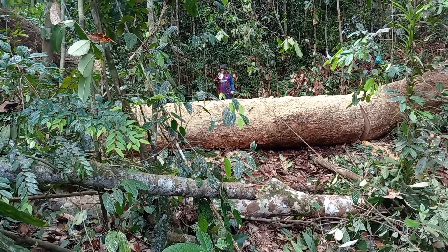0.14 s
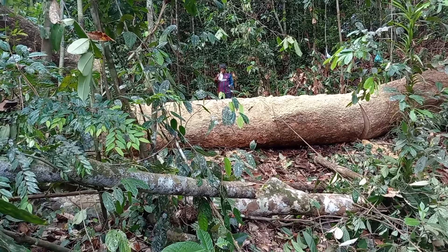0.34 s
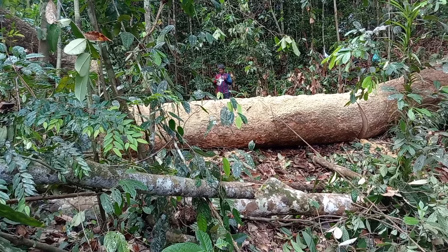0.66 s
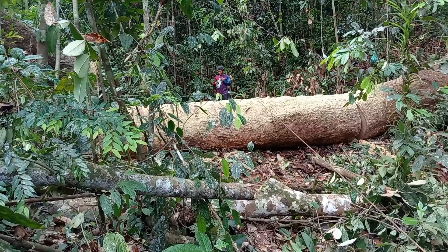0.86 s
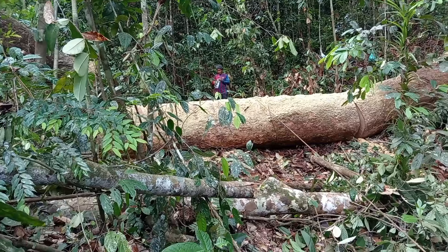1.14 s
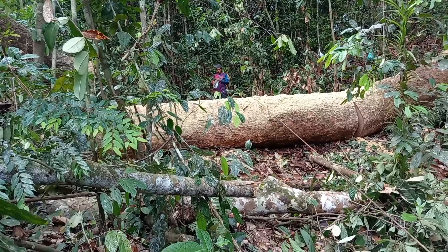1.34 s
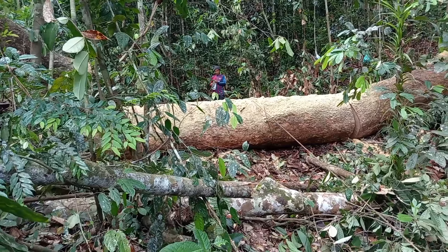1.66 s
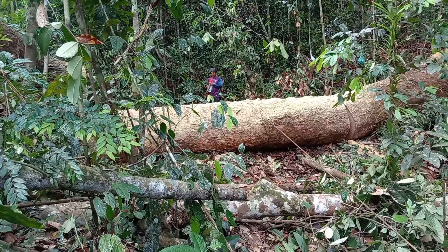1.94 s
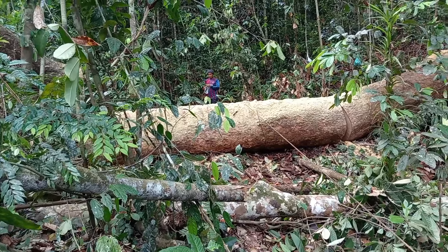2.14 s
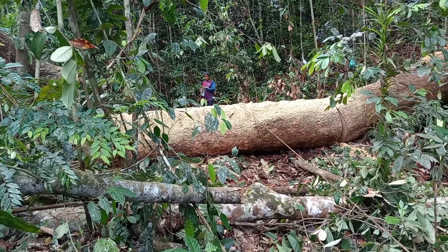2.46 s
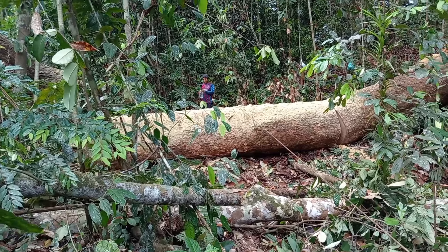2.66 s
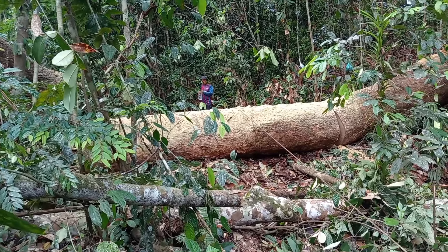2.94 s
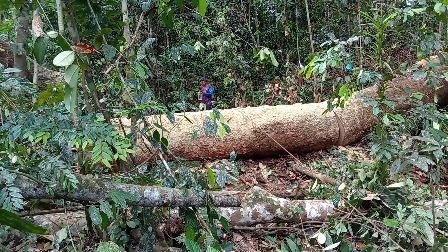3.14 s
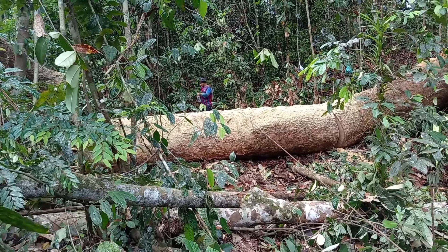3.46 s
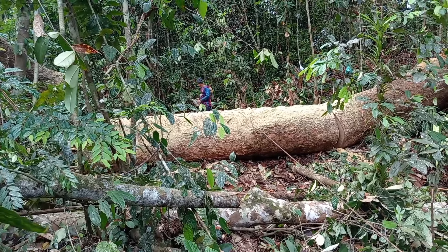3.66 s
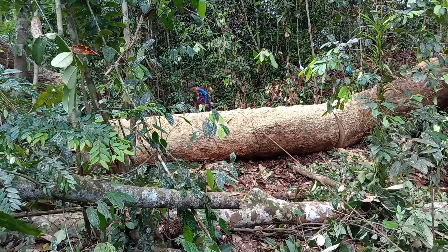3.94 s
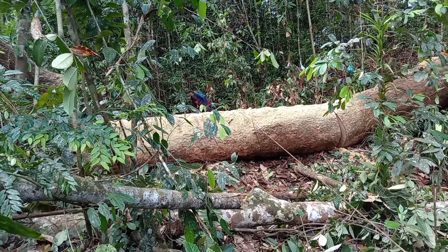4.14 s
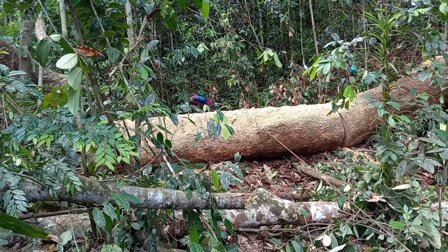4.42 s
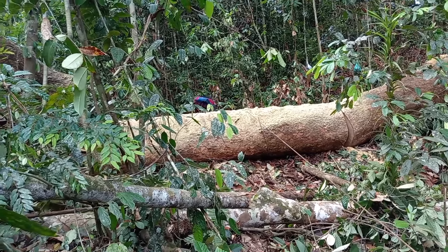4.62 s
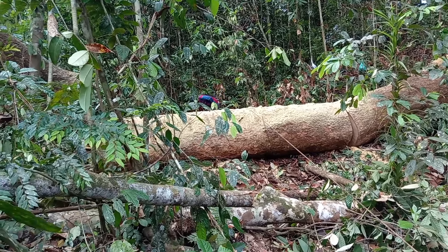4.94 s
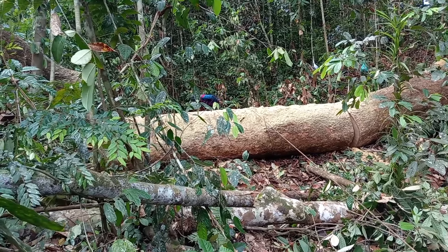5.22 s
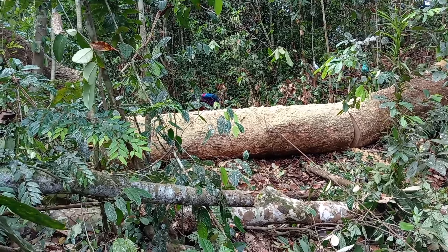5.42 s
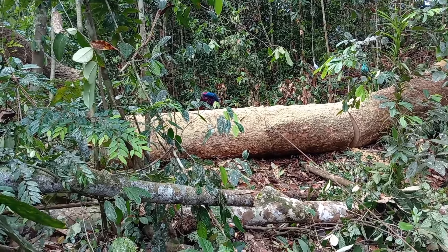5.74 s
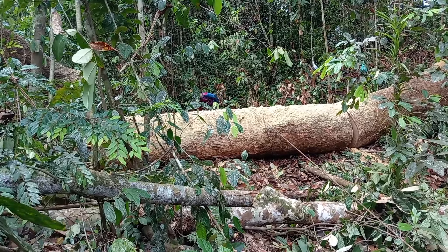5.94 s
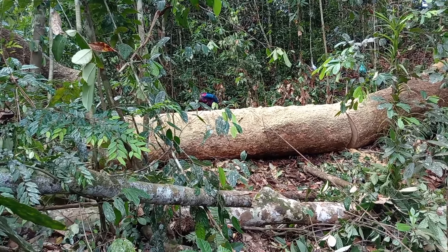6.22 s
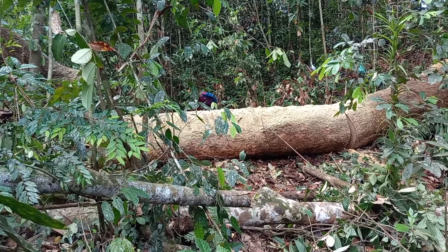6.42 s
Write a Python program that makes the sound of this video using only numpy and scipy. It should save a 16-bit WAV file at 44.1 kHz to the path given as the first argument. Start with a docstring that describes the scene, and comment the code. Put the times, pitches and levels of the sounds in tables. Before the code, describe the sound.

A hand ratchet winch clicks from the start, hauling a log in a forest, to the right of the microphone. Its strokes repeat evenly about every 0.65 seconds, ten pulls in all, the first near 0.4 seconds and the last near 6.3. Each pull is a steel clack followed by three or four quick, bright clicks, the last slightly late. Each return is a metal click and three to five lighter ticks. Loose links clink between strokes, with faint cable scrapes and slight low thuds underneath. A soft, hollow wooden knock comes at about 3.5 seconds, and a louder one at 4.2, just after an extra steel clack. The ratcheting keeps its pace until the end, at about 6.6 seconds. The clicks have a short, light echo from the trees, and a faint, high insect hiss and soft hush of air continue throughout.

```python
"""A faint clink, a clack and a run of light ticks: a hand ratchet winch is hauling a log in a forest.
On each pull the lever clacks home and the pawl (a small steel finger) drops over three or four teeth.
On each return the load lands on the catch and the pawl ticks back lightly. The cable scrapes, loose links
clink, and something wooden knocks twice, the louder time just after an extra steel clack. Every blow
makes a part ring at its own pitches. Leaves and trunks scatter every click, and insects hiss steadily."""
import sys
import numpy as np
from scipy import signal
from scipy.fft import rfft, irfft, next_fast_len
from scipy.io import wavfile
from scipy.ndimage import uniform_filter1d, map_coordinates

SR = 44100
rng = np.random.default_rng(int(sys.argv[2]) if len(sys.argv) > 2 else 0)


def transcribe(u):
    """Save the signal u as a 16-bit wav file named by the first command-line argument.

    u: samples, shape (n,) or (channels, n), limited to [-1, 1]; the rate is SR.
    q: integer samples, one column per channel.
    """
    v = np.clip(np.atleast_2d(u).T, -1, 1)
    q = np.round(v * 32767).astype(np.int16)
    wavfile.write(sys.argv[1], SR, q)


N = 290351
SIZE = 8192  # samples in one short sound
HZ = np.fft.rfftfreq(SIZE, 1 / SR)  # the frequencies in that sound
AGE = np.arange(SIZE) / SR  # seconds since it began

# Levels in the tables are relative. A "mode" is a pitch at which a part likes to ring.
# Pulls, the pawl dropping over a few teeth:
# first tooth/s, end of the even run/s, late last tooth/s, teeth, level/dB, treble/dB, thud/dB, scrape/dB
PULLS = [(0.4278, 0.5213, 0.609, 4, -15, -8.5, -48, -45),
         (1.0988, 1.1434, 1.1919, 3, -13.5, -12, -57.5, -47),
         (1.742, 1.835, 1.8949, 4, -13, -11, -52.5, -62),
         (2.4167, 2.4669, 2.5482, 3, -14, -10.5, -54.5, -41),
         (3.0864, 3.136, 3.216, 3, -16.5, -10, -55.5, -55),
         (3.7317, 3.7816, 3.8539, 3, -15.5, -7.5, -54.5, -39.5),
         (4.388, 4.4433, 4.5128, 3, -16.5, -8.5, -57, -37),
         (5.0461, 5.103, 5.1734, 3, -17, -11.5, -61.5, -49),
         (5.679, 5.7331, 5.8151, 3, -16.5, -10.5, -57.5, -52),
         (6.3143, 6.3656, 6.4266, 3, -13.5, -9, -61, -56)]
# Returns, the load landing on the catch and the pawl ticking back:
# landing/s, level/dB, treble/dB, thud/dB, scrape/dB, first tick/s, last tick/s, ticks, tick level/dB
RETURNS = [(0.0516, -18.5, -15.5, -58, -51, 0.1099, 0.277, 5, -29),
           (0.6927, -17.5, -15.5, -55, -41, 0.7545, 0.903, 5, -29),
           (1.3494, -15.5, -17, -48.5, -42.5, 1.4135, 1.575, 5, -29),
           (2.041, -16.5, -17.5, -50, -41.5, 2.0939, 2.212, 4, -28.5),
           (2.6576, -18.5, -13, -57, -47.5, 2.7184, 2.836, 4, -26.5),
           (3.3281, -18.5, -17.5, -53, -43, 3.3807, 3.504, 4, -26.5),
           (3.9948, -17.5, -15, -53, -44.5, 4.0466, 4.1234, 3, -26),
           (4.659, -15, -21, -51.5, -40, 4.7035, 4.805, 4, -26),
           (5.2977, -18, -21.5, -52.5, -38, 5.3473, 5.471, 4, -26.5),
           (5.9267, -17.5, -15.5, -54, -46, 5.9771, 6.082, 4, -25.5)]
# Steel clacks: the lever going home, and one clack just before the loud wooden knock:
# t/s, level/dB, treble/dB, thud/dB, rebound delay/s, rebound level/dB
CLACKS = [(0.3439, -18.5, -11, -49.5, 0.027, -19.5), (1.033, -11.5, -10, -46.5, .018, -24.5),
          (1.649, -17.5, -12.5, -53, 0.024, -20.5), (2.332, -18, -12.5, -46, 0.015, -20.5),
          (3.0078, -24.5, -16.5, -46, 0.011, -14), (3.650, -18.5, -10, -51, 0.01, -17),
          (4.158, -13, -7.5, -44.5, 0.016, -30), (4.2985, -18, -12, -48.5, 0.011, -17),
          (4.9439, -16, -13, -50, .0111, -19), (5.6061, -21, -6.5, -53, 0.011, -34),
          (6.237, -12.5, -9.5, -48, 0.018, -24.5)]
# Modes of the loose links, also used for the scrapes: f/Hz, width/Hz, level/dB
LINK_MODES = [(1557, 1490, 0), (1810, 570, 0.5), (2920, 360, -8.5), (3400, 440, -2), (3680, 870, -4.5),
              (4640, 1500, -4.5), (5920, 320, -14.5), (6627, 620, -21)]


def teeth():
    """Each pull turns the wheel evenly, then slows. Gives rows of t/s, level/dB, treble/dB, thud/dB."""
    slowing_db = -8.5  # a tooth is weaker by this each time the gap before it doubles
    first_tooth_db, thud_fade_db = -0.76, -5.5  # the first tooth is still slow; each thud is weaker
    rows = []
    for first, even_end, last, count, db, treble_db, thud_db, _ in PULLS:
        run, gap = np.linspace(first, even_end, round(count) - 1, retstep=True)
        times = np.append(run, last)
        doublings = np.log2(np.diff(times, prepend=first - gap) / gap)
        levels = db + slowing_db * doublings + first_tooth_db * (times == first)
        rows += [(t, levels[k], treble_db, thud_db + thud_fade_db * k) for k, t in enumerate(times)]
    return rows


def pawl_drops():
    """The pawl snaps down behind each tooth and rings."""
    modes = [(1445, 520, -15.5), (1680, 1660, -3), (2090, 120, -60), (2430, 460, -1), (2752, 212, -26),
             (3340, 780, -3), (3910, 440, 3.5), (4461, 285, -23), (5060, 730, -5.5), (5910, 2140, -6),
             (6550, 100, -10.5), (7720, 97, -15.5), (8630, 2550, -15.5), (11459, 3100, -46),
             (15000, 1500, -18)]  # the dropping pawl's ring: f/Hz, width/Hz, level/dB
    sound = clicks(teeth(), modes, level_db=-9, treble_db=7, attack_s=0.00084, contact_t60=0.03,
                   scatter_db=-17.5, scatter_t60=0.11, spread=2.57)
    return small_part(sound, edge_hz=1130)


def pawl_ticks():
    """With no load on it, the pawl skips back at an even pace, each tick a little different."""
    modes = [(952, 420, -6.5), (1350, 110, -7.5), (1764, 240, -9.5), (2015, 165, -6), (2310, 310, -11),
             (2990, 490, -11.5), (3420, 920, -7), (3974, 236, 1.5), (4716, 480, -2), (5717, 605, -0.5),
             (6450, 648, -10.5), (8430, 1200, -11), (10500, 3900, -13.5), (13050, 470, -20),
             (15260, 2100, -13)]  # the skipping pawl's ring: f/Hz, width/Hz, level/dB
    # t/s, level/dB, treble/dB
    ticks = [(t, rng.normal(db, 1), rng.normal(-9.5, 2))
             for *_, first, last, count, db in RETURNS for t in np.linspace(first, last, round(count))]
    sound = clicks(ticks, modes, level_db=-5, treble_db=3.5, attack_s=0.00095, contact_t60=0.017,
                   scatter_db=-15.5, scatter_t60=0.09, spread=2.43)
    return small_part(sound)


def steel_clacks():
    """Steel hits and rebounds once: the lever going home, and one clack just before the loud knock."""
    modes = [(1013, 240, -12), (1320, 364, -3.5), (1540, 77, -8.5), (1891, 580, -0.5), (2480, 310, -6.5),
             (2870, 550, -9), (3756, 630, -1.5), (4910, 410, -10), (5860, 1220, -12), (6734, 361, -41),
             (8230, 1300, -27.5), (15004, 1132, -28)]  # the clacking steel's ring: f/Hz, width/Hz, level/dB
    rebound_treble = [(.011, -14), (.016, -1)]  # a later rebound is brighter: delay/s, treble/dB
    blows = [row[:3] for row in CLACKS]
    for t, *_, delay, db in CLACKS:
        blows.append((t + delay, db, np.interp(delay, *np.transpose(rebound_treble))))
    return clicks(blows, modes, level_db=-5, treble_db=2, attack_s=0.00091, contact_t60=0.014,
                  scatter_db=-15, scatter_t60=0.11, spread=1.25)


def catch():
    """The load lands on the steel catch at the start of each return."""
    modes = [(1010, 340, -3), (1697, 680, -8), (2023, 340, -4), (2640, 360, -17), (2753, 200, -2.5),
             (3303, 240, 0.5), (3800, 440, 0), (4620, 270, -1.5), (5606, 930, -2), (6670, 190, -8.5),
             (8300, 1640, -17.5), (15128, 650, -22)]  # the catch's ring: f/Hz, width/Hz, level/dB
    sound = clicks(RETURNS, modes, level_db=-5.5, treble_db=6, attack_s=0.001, contact_t60=0.019,
                   scatter_db=-22, scatter_t60=0.095, spread=3.44)
    return small_part(sound)


def loose_links():
    """Loose links clink together as the stroke turns."""
    clinks = [(0.0221, -26, -10), (0.3237, -18.5, -4), (0.5845, -27, -15), (0.7932, -11.5, -12),
              (0.9393, -26.5, -27), (0.9802, -18.5, -5.5), (1.3342, -29, -2), (1.3621, -8.5, -2),
              (1.6254, -17.5, -4), (2.0173, -16.5, -4), (2.2928, -21.5, -2), (2.6048, -18.5, -18),
              (2.9363, -28.5, -4), (3.243, -18, -21), (3.466, -13.5, 0), (3.5926, -23.5, -6),
              (4.2547, -19, -5), (4.8224, -23, -29.5), (4.8849, -24, -1), (4.9964, -19.5, -13),
              (5.2811, -23, -18), (5.3338, -16, -19), (5.5463, -23, -4.5), (5.5815, -20, -8),
              (6.175, -21, -3), (6.5091, -35.5, -19)]  # link hitting link: t/s, level/dB, treble/dB
    sound = clicks(clinks, LINK_MODES, level_db=-15, treble_db=-4.5, attack_s=0.001, contact_t60=0.017,
                   scatter_db=-17.5, scatter_t60=0.094, spread=2.56)
    return small_part(sound)


def wheel_pings():
    """The toothed wheel sings on briefly after each tooth, at new strengths and slightly new pitches."""
    notes = [(2000, -4, .05), (2380, -3, .05), (3810, -1, .045), (4830, -8, .045), (7390, -12, .07)]  # the wheel's notes: f/Hz, level/dB, time to fade by 60 dB/s
    sounds = []
    for _, db, *_ in teeth():
        ring = 0
        for hz, note_db, t60 in notes:
            envelope = amp(note_db + rng.normal(0, 3)) * dying(t60)
            cycles = hz * rng.normal(1, .012) * AGE + rng.random((2, 1))
            ring += envelope * np.sin(2 * np.pi * cycles)
        sounds.append(amp(db - 18.5) * ring * rising(0.00024))
    return placed(np.transpose(teeth())[0], sounds)


def scrapes():
    """Cable strands slip in tiny jerks that swell until the steel hits; a brief grind leads each clack."""
    slips_per_s = 900
    # just before each landing, first tooth and steel clack: end/s, length/s, level/dB
    strains = ([(t, .028, db) for t, _, _, _, db, *_ in RETURNS]
               + [(t, .014, db) for t, *_, db in PULLS]
               + [(t, .0052, -42) for t, *_ in CLACKS])
    sounds = []
    for _, length, db in strains:
        slips = rng.standard_normal(SIZE) * (rng.random(SIZE) < slips_per_s / SR)
        hiss = 0.063 * rng.standard_normal((2, SIZE))
        swell = (AGE / length) ** 0.74 * (AGE < length)
        sound = irfft(rfft((slips + hiss) * swell) * body(LINK_MODES) / np.hypot(1, HZ / 3500))
        strength = np.sqrt(np.sum(sound ** 2) / (2 * length * SR))
        sounds.append(amp(db) * sound / strength)
    return placed([end - length for end, length, _ in strains], sounds)


def anchor():
    """Every change of load jolts the winch's anchor through the cable."""
    pull_modes = [(141.5, 147, -1), (188.4, 6.3, 2.5), (297, 73, -2), (389, 112, 0), (511, 75, -9),
                  (641, 48, 2.5), (711, 79, -3.5), (984, 76, -4)]  # the anchor under a pull: f/Hz, width/Hz, level/dB
    landing_modes = [(129.5, 62, 4), (162, 30, 0.5), (332, 160, -10), (642, 110, -16)]  # the anchor as the load lands: f/Hz, width/Hz, level/dB
    from_teeth = thuds(teeth(), pull_modes, level_db=-1.5,
                       delay_s=0.0016, attack_s=0.001, t60=0.15, spread=0.087)
    from_clacks = thuds(CLACKS, pull_modes, level_db=-1.5,
                        delay_s=0.00209, attack_s=0.003, t60=0.3, spread=0.4)
    from_landings = thuds(RETURNS, landing_modes, level_db=2.1,
                          delay_s=0.00094, attack_s=0.00073, t60=0.17, spread=0.069)
    return from_teeth + from_clacks + from_landings


def wood():
    """A dull blow and its one bounce ring the wood, with a weaker rolling shake afterwards."""
    # two faint low thuds under the winch's clacks, then two hollow wooden knocks: t/s, level/dB
    blows = [(0.432, -50), (3.026, -55), (3.4747, -28.5), (4.176, -18.5)]
    modes = [(150, 42, -3), (190, 40, -3.5), (310, 70, -9.5), (388, 39, -3), (500, 23, -10), (641, 53, 5.5),
             (722, 62, 1.5), (994, 85, -21), (1109, 82, -12.5)]  # the wood's ring: f/Hz, width/Hz, level/dB
    bounce_s, bounce_db = .0105, -6
    bounce = amp(bounce_db) * np.exp(-2j * np.pi * HZ * bounce_s)
    sounds = []
    for _, db in blows:
        shake = rng.standard_normal((3, SIZE)) * dying(0.14) * rising(0.0012)
        push = (AGE == 0) + 0.032 * (shake[0] + 0.25 * shake[1:])
        ring = irfft((rfft(push) + bounce) * body(modes))
        sounds.append(amp(db) * ring / abs(ring).max())
    return placed(np.transpose(blows)[0] - .002, sounds)


def trunk_echo(x):
    """The tree trunks answer the sound x, each frequency dying away at its own speed."""
    fade_times = [(120, 1), (600, 0.46), (1400, 0.22), (4000, 0.28), (8000, 0.15), (15000, 0.24)]  # how long the echo lasts: f/Hz, time to fade by 60 dB/s
    hz, t, noise = signal.stft(rng.standard_normal((2, SR)), SR, nperseg=256)
    envelope = dying(along(fade_times, hz)[:, None], t) * rising(0.0043, t)
    tail = signal.istft(noise * envelope, SR, nperseg=256)[1]
    return signal.fftconvolve(x, tail / np.linalg.norm(tail[0]), axes=1)[:, :N]


def insects():
    """A chorus of insects blends into a high, shimmering hiss."""
    bands = [(5860, 340, 7.5), (6950, 360, -5.5), (12000, 180, -45.5)]  # where the insects sing: f/Hz, width/Hz, level/dB
    chorus = unit(filtered(rng.standard_normal((2, N)), lambda hz: resonances(bands, hz)))
    return chorus * amp(-59 + 1.7 * wobble(0.97) + 0.6 * wobble(73))


def forest_air():
    """Still air among the leaves makes a soft hush, alike on the left and right in the bass only."""
    spectrum = [(25, -19), (60, -6), (120, 3), (200, -5), (300, -8), (600, -13.5), (1000, -15.5),
                (1400, -17), (2100, -8), (3000, -9), (4500, -12), (7000, -5.5), (8500, -41), (11000, -56),
                (16000, -42.5)]  # the tone of the hush: f/Hz, level/dB
    noise = rng.standard_normal((3, N))
    shared = filtered(noise[0], lambda hz: 1 / np.hypot(1, hz / 700))
    apart = filtered(noise[1:], lambda hz: 0.46 + hz / np.hypot(700, hz))
    hush = unit(filtered(shared + apart, lambda hz: amp(along(spectrum, hz))))
    return hush * amp(-62.5 + 0.92 * wobble(6.3))


def clicks(rows, modes, level_db, treble_db, attack_s, contact_t60, scatter_db, scatter_t60, spread):
    """Steel on steel: a brief chatter rings the part, and nearby leaves and ground scatter it."""
    times, db, bright_db = np.transpose(rows)[:3]
    lead_s = .005  # room for the sound to swell just before the blow
    noise = rng.standard_normal((len(times), 6, SIZE))
    since_blow = np.maximum(AGE - lead_s, 0)
    rise = (1 + np.tanh((AGE - lead_s - .0005) / attack_s)) / 2
    contact = rise * dying(contact_t60, since_blow)
    scatter = rise * amp(scatter_db) * dying(scatter_t60, since_blow)
    leaves = 1 / np.hypot(1, (HZ / 11000) ** 2)  # leaves soak up the highest treble
    shared = rfft(noise[:, :1] * contact) + leaves * rfft(noise[:, 1:2] * scatter)
    # spread sets how much left and right differ, most of all in the scatter and the treble
    apart = 0.14 * rfft(noise[:, 2:4] * contact) + leaves * rfft(noise[:, 4:] * scatter)
    chatter = shared + apart * spread * HZ / (HZ + 2500)
    # each blow lands on a new spot, which changes the level of each mode
    changes_db = rng.normal(0, 1.77, (len(times), len(modes)))
    bodies = np.array([body(np.array(modes) + np.outer(change, [0, 0, 1])) for change in changes_db])
    ring = chatter * bodies[:, None]
    # a sharper contact puts more of its energy into the high modes
    highs = 1 / (1 + (3300 / (HZ + 1)) ** 8)
    power = np.mean(abs(ring) ** 2, axis=1)
    treble_share = np.sqrt(power @ highs / power.sum(1))
    treble_gain = amp(bright_db + treble_db) / treble_share
    sounds = irfft(ring * treble_gain[:, None, None] ** highs)
    return placed(times - lead_s, at_level(sounds, db + level_db, window=SR // 300))


def thuds(rows, modes, level_db, delay_s, attack_s, t60, spread):
    """A soft jolt shakes a heavy body; spread sets how much left and right differ."""
    times, _, _, thud_db = np.transpose(rows)[:4]
    noise = rng.standard_normal((len(times), 3, SIZE))
    push = (noise[:, :1] + spread * noise[:, 1:]) * dying(t60) * rising(attack_s)
    sounds = irfft(rfft(push) * body(modes))
    return placed(times + delay_s, at_level(sounds, thud_db + level_db, window=SR // 50))


def small_part(x, edge_hz=1464):
    """Small parts give off little low sound, so x is cut away below edge_hz."""
    return filtered(x, lambda hz: 1 / np.sqrt(1 + (edge_hz / (hz + 20)) ** 16))


def from_right(x, lag_s):
    """A sound from the right reaches the left microphone lag_s later, and duller."""
    balance = [(100, 0.5), (500, 0), (1000, -2.5), (2000, -1.5), (4000, -4.5), (8000, -6.5), (14000, -9)]  # how the two sides differ: f/Hz, left minus right/dB
    microphone = [(7500, 0.5), (10500, -21.5)]  # both microphones lose the highest treble: f/Hz, level/dB
    side = np.array([[.5], [-.5]])  # left, right

    def response(hz):
        gain = amp(along(microphone, hz) + side * along(balance, hz))
        return gain * np.exp(-2j * np.pi * hz * lag_s * side)
    return filtered(x, response)


def resonances(modes, hz):
    """How strongly each frequency comes through: one steep-sided peak for each mode."""
    return np.sqrt(sum(amp(db) ** 2 / (1 + ((hz * hz - centre * centre) / (width * (hz + 1))) ** 2) ** 2
                       for centre, width, db in modes))


def body(modes):
    """The frequency response of an object with these modes, which rings only after it is hit."""
    cepstrum = irfft(np.log(resonances(modes, HZ) + 1e-6))
    # folding the second half onto the first moves all the ringing to after the blow
    cepstrum[1:SIZE // 2] *= 2
    cepstrum[SIZE // 2 + 1:] = 0
    return np.exp(rfft(cepstrum))


def rising(attack_s, t=AGE):
    """A fade-in from 0 to 1, about two thirds done after attack_s."""
    return 1 - np.exp(-t / attack_s)


def dying(t60, t=AGE):
    """A fade-out that loses 60 dB in t60 seconds."""
    return np.exp(-np.log(1000) * t / t60)


def at_level(sounds, db, window):
    """Scale each sound so that its loudest stretch, window samples long, has the level db."""
    peak = np.sqrt(uniform_filter1d(np.mean(sounds ** 2, axis=1), window).max(1))
    return sounds * (amp(db) / peak)[:, None, None]


def placed(times, sounds):
    """Lay short stereo sounds out at their times."""
    out = np.zeros((2, N + SIZE))
    for t, sound in zip(times, sounds):
        start = max(round(t * SR), 0)
        out[:, start:start + SIZE] += sound
    return out[:, :N]


def amp(db):
    """Turn decibels into a number to multiply by."""
    return 10 ** (np.asarray(db) / 20)


def unit(x):
    """Scale x to an average power of 1."""
    return x / np.sqrt(np.mean(x ** 2) + 1e-20)


def along(points, hz):
    """Read between (frequency, value) points, giving every octave the same room."""
    f, values = np.transpose(points)
    return np.interp(np.log(hz + 1), np.log(f + 1), values)


def filtered(x, response):
    """Multiply each frequency in x by response(hz)."""
    size = next_fast_len(N + SR // 2)
    return irfft(rfft(x, size) * response(np.fft.rfftfreq(size, 1 / SR)), size)[..., :N]


def wobble(rate):
    """A smooth curve through rate random values a second."""
    return map_coordinates(rng.standard_normal(int(N * rate / SR) + 4), [np.arange(N) * rate / SR])


def scene():
    """The winch stands well to the right, its anchor and the wood nearer the middle."""
    winch = pawl_drops() + pawl_ticks() + steel_clacks() + catch()
    winch += loose_links() + wheel_pings() + scrapes()
    direct = from_right(winch, lag_s=0.0004142) + from_right(anchor() + wood(), lag_s=0.00022)
    return direct + amp(-23.5) * trunk_echo(direct) + insects() + forest_air()


def record(dry):
    """Nothing above 16550 Hz is kept."""
    return filtered(dry, lambda hz: hz < 16550)


dry = scene()
out = record(dry)
transcribe(out)
```